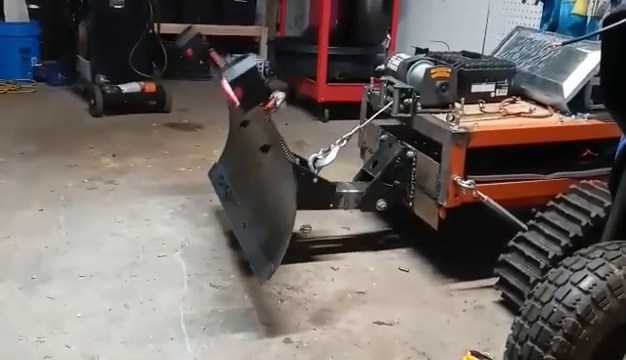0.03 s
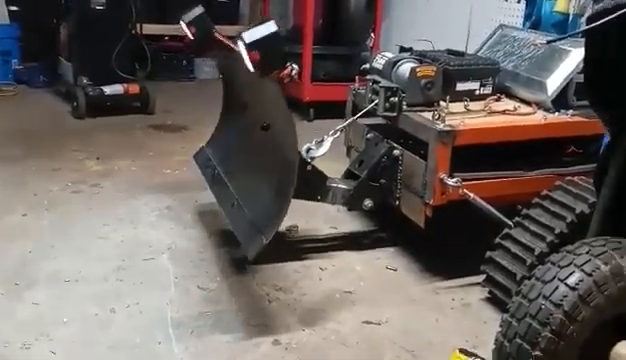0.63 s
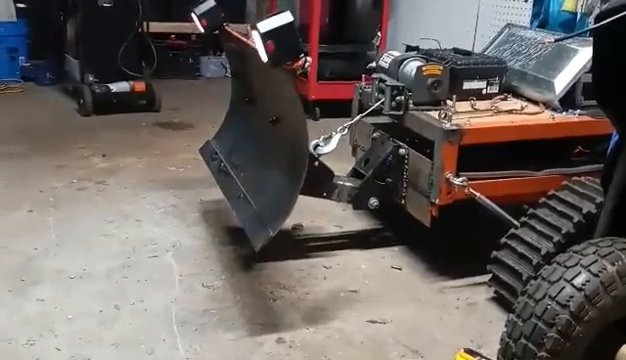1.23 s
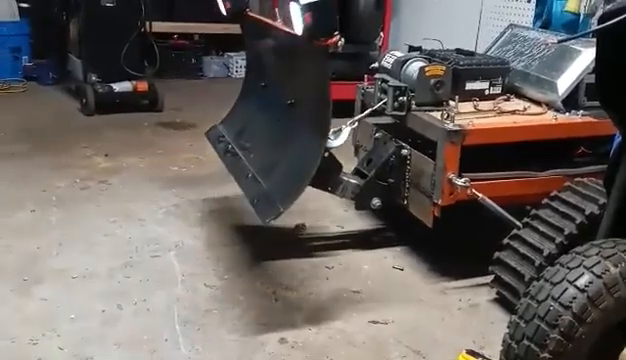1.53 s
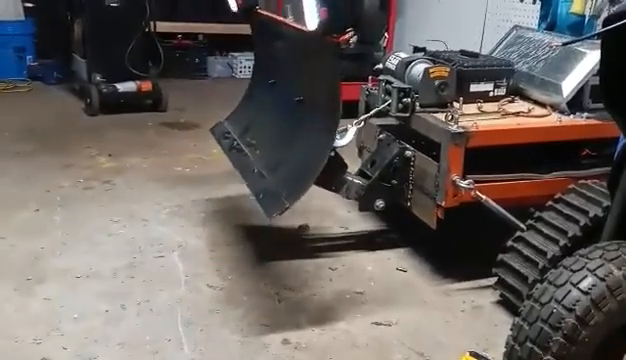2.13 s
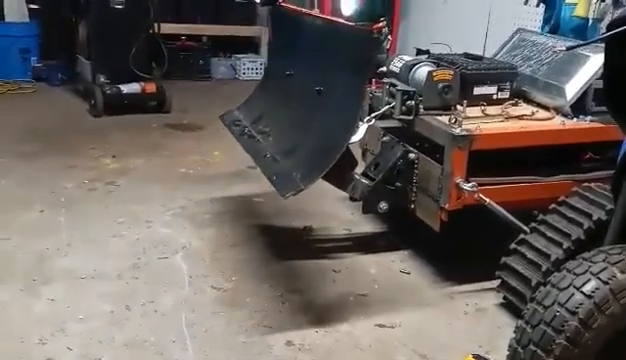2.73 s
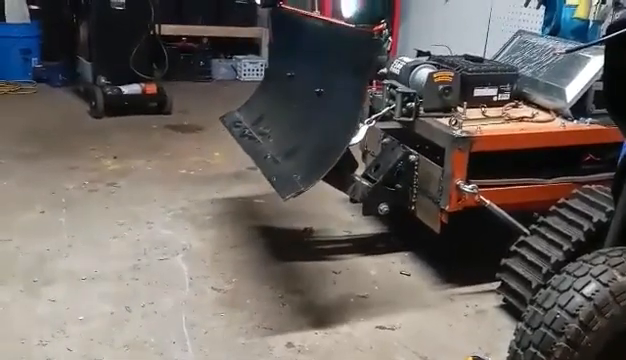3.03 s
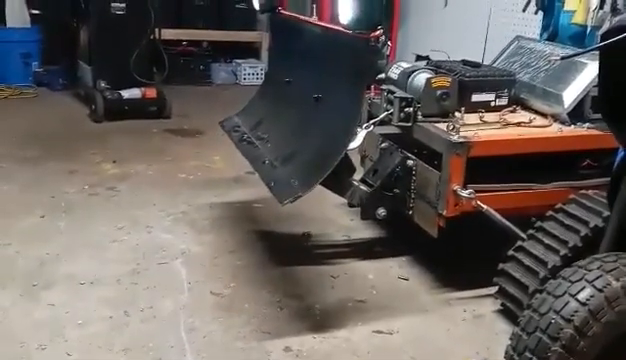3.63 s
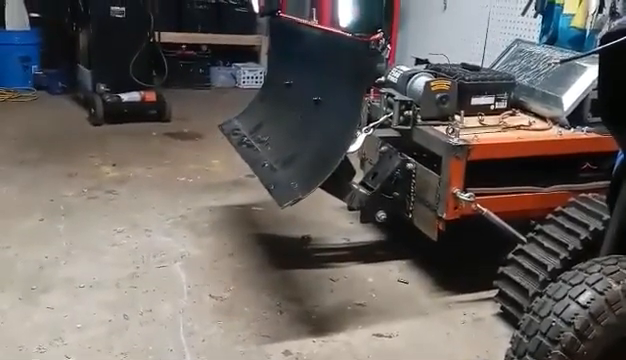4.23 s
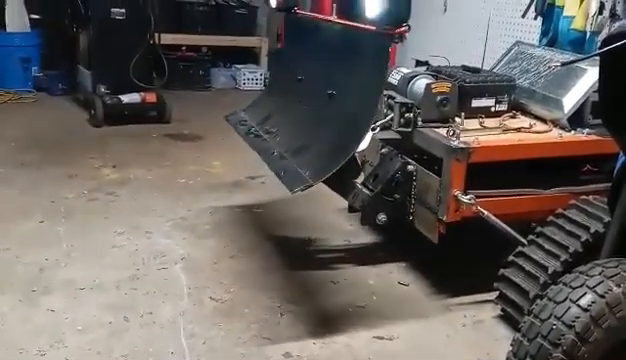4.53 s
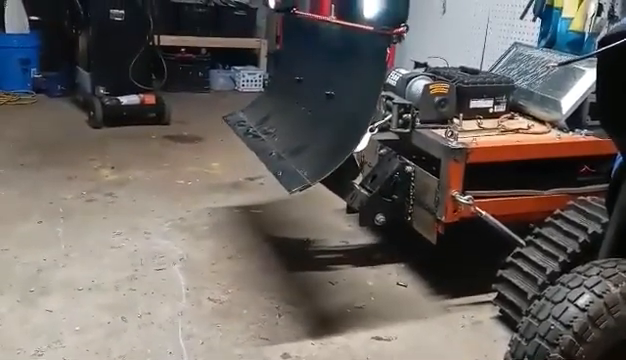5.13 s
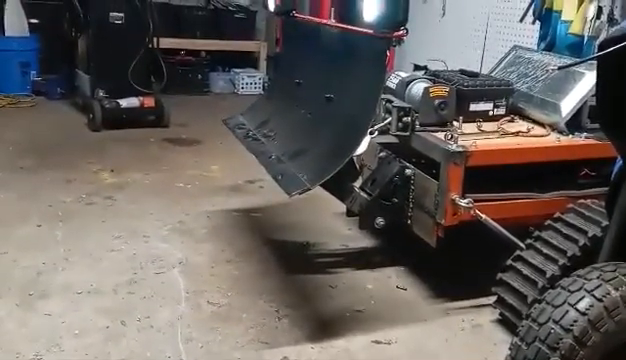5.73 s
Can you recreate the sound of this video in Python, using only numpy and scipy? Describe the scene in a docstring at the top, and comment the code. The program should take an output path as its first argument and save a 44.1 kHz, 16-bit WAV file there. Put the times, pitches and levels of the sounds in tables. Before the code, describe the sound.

A small electric winch lifts a steel plow blade a few steps away in a slightly echoing garage. From the start until about 1.3 seconds, the geared motor gives five quick, rattling, whining bursts, each beginning with a light relay tick. A plastic control switch snaps sharply six times close to the microphone, and two knocks land at about 0.4 and 1.2 seconds. Longer pulls run from 1.3 to 1.8 seconds and, after another snap, from 2.1 to 2.6 seconds, each spinning up and coasting down. After each, the blade rings softly and its springs and hook jingle. A few faint scuffs fall in the quiet between 2.9 and 3.9 seconds. The switch snaps again at 4.2 seconds, and a last pull whirs until 4.7 seconds. The blade's ringing then fades into low room hum.

```python
"""Electric winch of a radio-controlled plow, lifting the steel blade in eight short pulls in a garage.
Each pull: a relay ticks, the geared motor spins up and coasts down; teeth rattle and whine, brushes hiss.
The cable then jerks the blade, which rings on while its springs and hook jingle.
A plastic control switch snaps close by; the early pulls add two heavy knocks and two light
relay-release clicks. A few faint scuffs fall in the quiet."""
import sys
import numpy as np
from scipy import signal
from scipy.fft import rfft, irfft
from scipy.io import wavfile

SR = 44100
rng = np.random.default_rng(int(sys.argv[2]) if len(sys.argv) > 2 else 0)


def bounce(signal):
    """Save signal as a 16-bit WAV file at the path given by the first command-line argument."""
    frames = np.transpose(np.atleast_2d(signal))
    limited = np.clip(frames, -1, 1)
    pcm = np.round(limited * 32767).astype(np.int16)
    wavfile.write(sys.argv[1], SR, pcm)


N = 259308
T = np.arange(N) / SR

# room tone and microphone hiss (frequency [Hz], relative density [dB])
ROOM_TONE_SPECTRUM = [(20, -18), (60, -3.5), (130, -2.5), (240, -7.5), (350, -16.5), (600, -17.5),
                      (1000, -22.5), (2500, -27), (4000, -27), (5500, -37), (7500, -22), (13000, -21)]
# garage decay (frequency [Hz], t60 [s])
GARAGE_DECAY = [(100, 0.98), (350, .5), (700, .4), (2000, 0.32), (4000, 0.33), (8000, 0.3), (13000, .3)]
# stereo width (frequency [Hz], side gain [dB])
SIDE_GAIN = [(2700, -74.5), (3700, -31), (5500, -3), (8500, -3.5), (11000, -1.5), (12500, -10.5)]
# scuffs (peak time [s], rise [s], level [dB])
SCUFFS = [(2.92, .01, -70), (3.146, .008, -69.5), (3.648, .012, -64), (3.852, .003, -54),
          (3.884, 0.013, -49.5)]
# scuff noise (frequency [Hz], relative density [dB])
SCUFF_SPECTRUM = [(500, -48), (1150, 1), (2200, 0.5), (3000, -8.5), (4000, -1), (6500, -8.5), (13000, -16)]
# two heavy knocks, two light relay-release clicks between (time [s], click level [dB], frame level [dB])
KNOCKS_AND_RELEASES = [(0.396, -31.5, -15), (0.7548, -20.5, -24.5), (1.0337, -27, -30), (1.151, -29.5, -12)]
# relay click (frequency [Hz], relative density [dB])
CLICK_SPECTRUM = [(500, -24.5), (2000, -4.5), (4000, 3), (5500, -3), (7300, 3.5), (10000, -5.5),
                  (14000, -16)]
# switch presses and releases (time [s], level [dB])
SNAPS = [(0.2447, -12), (0.755, -11), (0.8757, -10), (0.973, -15.5), (1.094, -9.5), (1.239, -8.5),
         (2.0700, -7.5), (4.24, -9)]
# switch case (frequency [Hz], level [dB], t60 [s])
CASE_MODES = [(900, -16, 0.011), (1880, 5, 0.016), (2170, -1, 0.026), (2620, -9.5, 0.0071),
              (3720, -3.5, 0.016), (3970, -1.5, .011), (9400, -9, .008), (11500, -14, .008)]
# switch crack (frequency [Hz], relative density [dB])
CRACK_SPECTRUM = [(300, -28.5), (700, 3.5), (2000, 1.0), (4500, 6), (6000, -2.5), (13000, -6.5)]
# hanging blade (frequency [Hz], level [dB], t60 [s])
BLADE_MODES = [(237, -4, 1.5), (361, -9, .8), (759, -11.5, 4.5), (829, -6, 1.0), (877, -1, 1.3),
               (1093, -5, 1.8), (1157, -11, 2.6), (1346, -3, .8), (1480, -3, .85), (1938, -16, 1.2)]
# springs and hook (frequency [Hz], relative level [dB])
JINGLE_SPECTRUM = [(650, 13), (1000, 7.5), (1500, 4), (2300, -3), (2800, -3), (3200, -7.5), (3600, 2.5),
                   (4500, -5.5)]
# brush hiss (frequency [Hz], relative density [dB])
HISS_SPECTRUM = [(1000, -33), (4000, 2.5), (5600, -11.5), (7200, 7), (8500, 2.5), (10000, 4), (11600, -0.5),
                 (12300, -8), (14000, -14)]
# brush fizz near full speed (frequency [Hz], relative density [dB])
FIZZ_SPECTRUM = [(5000, -29), (7500, -10), (9500, 0.5), (11500, 1), (13000, -7)]
# gear rattle (frequency [Hz], relative density [dB])
GEARBOX_SPECTRUM = [(40, -42), (90, -24), (130, -17.5), (190, -14.5), (300, -6), (450, -6.5), (640, 1.5),
                    (800, -1.5), (1050, -2), (1650, 0), (2200, -6), (4100, -11), (5500, -22), (13000, -36)]
# winch frame resonances (frequency [Hz], width [Hz], boost [dB])
FRAME_PEAKS = [(215, 22, 2.5), (324, 35, 2.5), (960, 110, 3), (1028, 66, 4.5), (1343, 92, 4), (1470, 81, 5),
               (1826, 48, 1), (3020, 130, 4.5)]
# gear tones (multiple of tooth rate [x], level [dB]); elevenths are sidebands of the 11-tooth wheel
GEAR_TONES = [(1, 0), (2, -3.5), (3, -13), (4, -14), (5, -18), (10, -16), (11, -19), (25.4, -29),
              (10 / 11, -17), (19 / 11, -13), (30 / 11, -15)]
# winch pulls (start [s], powered [s], rattle level [dB], whine level [dB], blade ring time [x])
PULLS = [(0.04, .14, -17, -24, .45), (0.374, 0.122, -17.5, -22.5, .3), (0.582, 0.133, -18.5, -23.5, .3),
         (0.9139, .056, -18.5, -21.5, .3), (1.1234, 0.051, -18.5, -26, .5),
         (1.3314, 0.32, -18.5, -20, 0.99), (2.1215, 0.36, -17.5, -20, 0.84), (4.3464, 0.22, -17, -21, 0.95)]


def amp(db):
    """Decibels to gain."""
    return 10 ** (np.asarray(db) / 20)


def unit(x):
    """Scale to rms 1."""
    return x / np.sqrt(np.mean(x ** 2) + 1e-20)


def lookup(table, hz):
    """Interpolate on a log-frequency axis."""
    table_hz, value = np.transpose(table)
    return np.interp(np.log(hz + 1), np.log(table_hz + 1), value)


def add(mix, start_s, sound):
    """Mix in at start_s."""
    part = mix[max(round(start_s * SR), 0):][:len(sound)]
    part += sound[:len(part)]


def colour(x, spectrum, peaks=(), size=8192):
    """Minimum-phase filter of energy 1 from a spectrum plus resonances."""
    hz = abs(np.fft.fftfreq(size, 1 / SR))
    peaks_db = sum(db / (1 + (2 * (hz - peak_hz) / width_hz) ** 2) for peak_hz, width_hz, db in peaks)
    log_gain = np.log(amp(lookup(spectrum, hz) + peaks_db))
    taps = np.fft.ifft(np.exp(np.conj(signal.hilbert(log_gain)))).real[:size // 2]
    return signal.oaconvolve(x, taps / np.linalg.norm(taps))[:len(x)]


def wander(length, hz):
    """Random drift of rms 1, up to about hz."""
    points = rng.standard_normal(8000)
    return np.interp(T[:length] * 2 * hz, np.arange(len(points)), points) * np.sqrt(3 / 2)


def sine(cycles):
    """Sine with a random start phase."""
    return np.sin(2 * np.pi * (cycles + rng.random()))


def ring(modes, t, stretch=1):
    """Decaying modes of a struck body."""
    return sum(amp(db) * np.exp(-np.log(1000) * t / (t60_s * stretch)) * sine(hz * t)
               for hz, db, t60_s in modes)


def room_tone():
    """Steady room noise and microphone hiss, independent per side."""
    return np.sqrt(2) * np.array([colour(x, ROOM_TONE_SPECTRUM) for x in rng.standard_normal((2, N))])


def garage(x):
    """Dense stereo reflections; each band decays at its own rate."""
    hz, t, bands = signal.stft(rng.standard_normal((2, SR)), SR, nperseg=256)
    decay = np.exp(-np.log(1000) * t / lookup(GARAGE_DECAY, hz)[:, None])
    tail = signal.istft(bands * decay, SR, nperseg=256)[1]
    tail *= 1 - np.exp(-(T[:tail.shape[1]] / .0025) ** 2)
    return signal.fftconvolve(x[None], tail / np.linalg.norm(tail[0]), axes=1)[:, :N]


def scuffs(fall_s=.032):
    """Soft, grainy rubs."""
    envelope = sum(amp(db) * np.exp(-np.maximum((peak_s - T) / rise_s, (T - peak_s) / fall_s))
                   for peak_s, rise_s, db in SCUFFS)
    return colour(envelope * rng.standard_normal(N) * amp(1.65 * wander(N, hz=400)), SCUFF_SPECTRUM)


def relay_and_knocks(tick_db=-22.5, thud_db=-29):
    """Contacts tick at each pull's start and twice on release; these and two knocks thud in the frame."""
    clicks, thuds = np.zeros((2, N))
    t = T[:SR // 20]
    ticks = [(pull[0], tick_db, thud_db) for pull in PULLS]
    for start_s, click_db, frame_db in ticks + list(KNOCKS_AND_RELEASES):
        add(clicks, start_s, amp(click_db) * np.exp(-t / .003) * rng.standard_normal(len(t)))
        add(thuds, start_s, amp(frame_db) * np.exp(-t / .012) * rng.standard_normal(len(t)))
    return colour(clicks, CLICK_SPECTRUM) + colour(thuds, GEARBOX_SPECTRUM, FRAME_PEAKS)


def switch(low_cut_hz=500):
    """Sharp crack and short ring of a plastic case too small to radiate bass."""
    snaps, t = np.zeros(N), T[:SR // 10]
    attack = 1 - np.exp(-t / .0003)
    for start_s, db in SNAPS:
        crack = colour(rng.standard_normal(len(t)) * np.exp(-t / .0016), CRACK_SPECTRUM)
        add(snaps, start_s, amp(db) * attack * (.36 * ring(CASE_MODES, t) + .55 * crack))
    return signal.sosfilt(signal.butter(3, low_cut_hz, "high", fs=SR, output="sos"), snaps)


def cable_jerks(lag_s=.02, base_db=-48, lift_db_per_s=7.5, lowered_stretch=.24):
    """One jerk at time 0, then one after each power cut, harder as winching time adds up."""
    start_s, powered_s, _, _, stretch = np.transpose(PULLS)
    jerk_s = np.append(0, start_s + powered_s + lag_s)
    lifted_s = np.append(0, np.cumsum(powered_s))
    return zip(jerk_s, base_db + lift_db_per_s * lifted_s, np.append(lowered_stretch, stretch))


def blade(jingle_tones=80, scuff_loss_db=4.5):
    """Jerked steel rings, wavering as it swings; springs and hook jingle. Later scuffs damp both."""
    ringing, shake = np.zeros((2, N))
    t = T[:3 * SR]
    for jerk_s, db, stretch in cable_jerks():
        rubs = sum(np.clip((jerk_s + t - at_s) / .05, 0, 1) for at_s, _, _ in SCUFFS if at_s > jerk_s)
        envelope = amp(db - scuff_loss_db * rubs) * (1 - np.exp(-t / .025))
        modes = sum(amp(1.4 * wander(len(t), hz=22.53)) * ring([m], t, stretch) for m in BLADE_MODES)
        add(ringing, jerk_s, envelope * modes)
        add(shake, jerk_s, envelope * (1 - np.exp(-t / .13)) * np.exp(-t / (.35 * stretch)))
    jingle_hz = rng.uniform(JINGLE_SPECTRUM[0][0], JINGLE_SPECTRUM[-1][0], jingle_tones)
    jingle = sum(amp(lookup(JINGLE_SPECTRUM, hz)) * wander(N, hz=22.9) * np.sin(2 * np.pi * hz * T)
                 for hz in jingle_hz)
    return ringing + amp(-15) * shake * unit(jingle)


def worn_rim(turns, size=1200):
    """Rim roughness, repeating every turn."""
    return unit(np.interp(turns % 1, np.linspace(0, 1, size), rng.standard_normal(size)))


def teeth(mesh_cycles, shaft_share=.3, wheel_share=.18, knock_share=.26):
    """Teeth scrape and knock; part of the scrape repeats with the motor shaft, part with the slow wheel."""
    scrape = np.sqrt(1 - shaft_share - wheel_share) * rng.standard_normal(len(mesh_cycles))
    scrape += np.sqrt(shaft_share) * worn_rim(mesh_cycles * 3 / 10, size=400)
    scrape += np.sqrt(wheel_share) * worn_rim(mesh_cycles / 11)
    scrape *= .98 + np.exp(-(mesh_cycles % 1) / .25)
    knocks = np.diff(np.floor(mesh_cycles), prepend=0) * rng.uniform(-1.1, 1, len(mesh_cycles))
    return np.sqrt(1 - knock_share) * unit(scrape) + np.sqrt(knock_share) * unit(knocks)


def gear_whine(mesh_cycles, waver_db=2.8):
    """Tones locked to the tooth rate; the higher ones waver most."""
    tones = np.zeros(len(mesh_cycles))
    for multiple, db in GEAR_TONES:
        drift_db = waver_db * min(multiple / 2, 1) * wander(len(tones), hz=34.1)
        tones += amp(db + drift_db) * sine(multiple * mesh_cycles)
    return tones


def winch():
    """Geared motor spins up, sags under load and coasts out by friction. Returns (noise, whine)."""
    full_mesh_hz, sag_per_s = 369, .045
    spin_up_tau_s, full_coast_s, slack_s = .055, .125, .018
    surge_db, surge_tau_s = 2.5, .13  # starting current drives the teeth harder
    hiss_db, fizz_db = -35, -36.5
    rattle, whine, hiss, fizz = np.zeros((4, N))
    for start_s, powered_s, rattle_db, whine_db, _ in PULLS:
        coast_s = full_coast_s * (1 - np.exp(-powered_s / spin_up_tau_s)) ** .55
        t = T[:int((powered_s + coast_s) * SR)]
        run_down = np.clip(1 - (t - powered_s) / coast_s, 0, 1)
        spin_up = np.minimum(1.07 * (1 - np.exp(-np.minimum(t, powered_s) / spin_up_tau_s)), 1)
        speed = spin_up * (1 - sag_per_s * t) * run_down ** .2
        mesh_hz = full_mesh_hz * speed * (1 + .007 * wander(len(t), hz=45.02))
        mesh_cycles = np.cumsum(mesh_hz) / SR
        engaged = 1 - np.exp(-(t / slack_s) ** 2)
        drive_db = rattle_db + surge_db * np.exp(-t / surge_tau_s)
        chatter_db = 1.2 * wander(len(t), hz=60)
        add(rattle, start_s, amp(drive_db + chatter_db) * engaged * run_down ** 1.77 * teeth(mesh_cycles))
        add(whine, start_s, amp(whine_db) * speed ** 3.1 * run_down ** 2.6 * gear_whine(mesh_cycles))
        brush_noise = teeth(mesh_cycles, shaft_share=.33, wheel_share=.42, knock_share=.15)
        add(hiss, start_s, amp(hiss_db) * speed ** 1.2 * run_down ** 2.6 * brush_noise)
        add(fizz, start_s, amp(fizz_db) * speed ** 12 * run_down ** 4 * teeth(mesh_cycles))
    brushes = colour(hiss, HISS_SPECTRUM) + colour(fizz, FIZZ_SPECTRUM)
    return colour(rattle, GEARBOX_SPECTRUM, FRAME_PEAKS) + brushes, whine


def scene():
    """Plow a few steps away in the garage, switch next to the microphone."""
    winch_noise, whine = winch()
    machine = winch_noise + relay_and_knocks()
    snaps = switch()
    direct = amp(-3.5) * machine + amp(4) * whine + blade() + snaps + scuffs()
    reflected = garage(amp(-2.5) * machine + amp(-5) * whine + amp(-10) * snaps)
    return direct + reflected + amp(-65.5) * room_tone()


def record(dry):
    """Mono except in the treble; steep low-pass."""
    cutoff_hz = 13250
    mid, side = dry.mean(0), (dry[0] - dry[1]) / 2
    side = irfft(rfft(side) * amp(lookup(SIDE_GAIN, np.fft.rfftfreq(N, 1 / SR))), N)
    low_pass = signal.firwin(401, cutoff_hz, window=("kaiser", 9), fs=SR)
    return signal.oaconvolve(np.array([mid + side, mid - side]), low_pass[None], "same", axes=1)


dry = scene()
out = record(dry)
bounce(out)
```